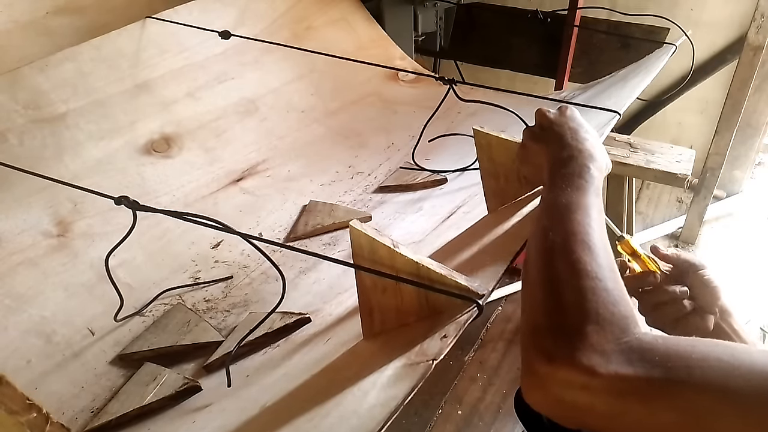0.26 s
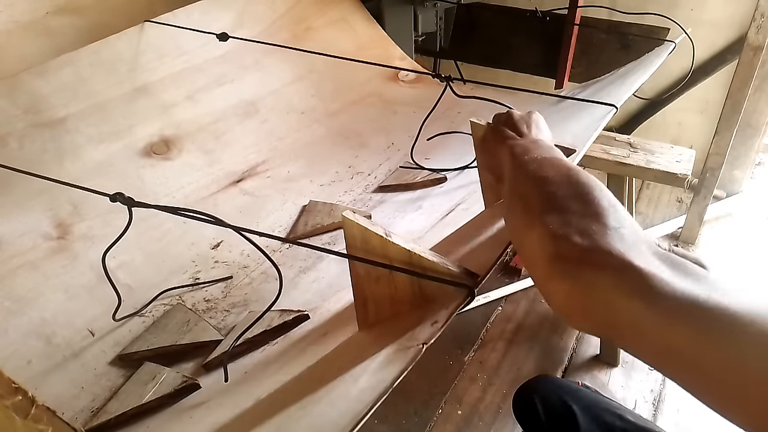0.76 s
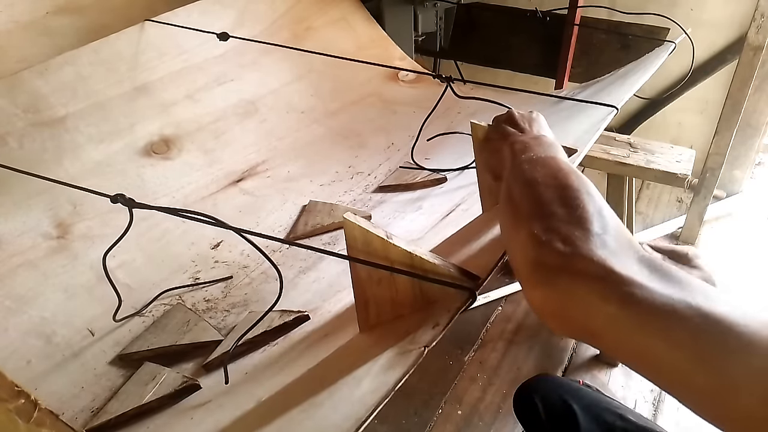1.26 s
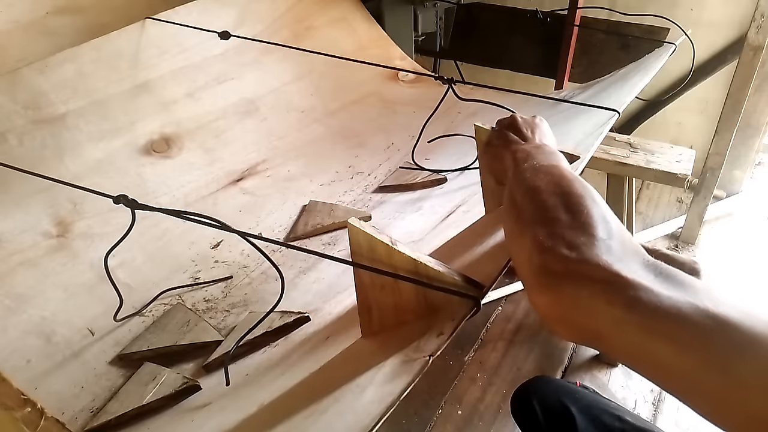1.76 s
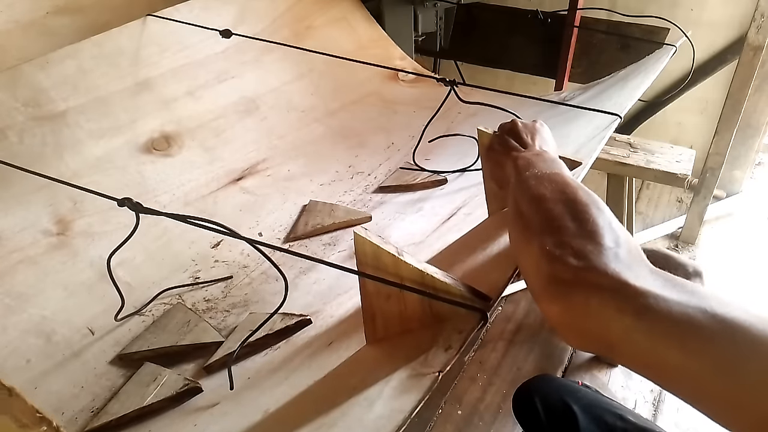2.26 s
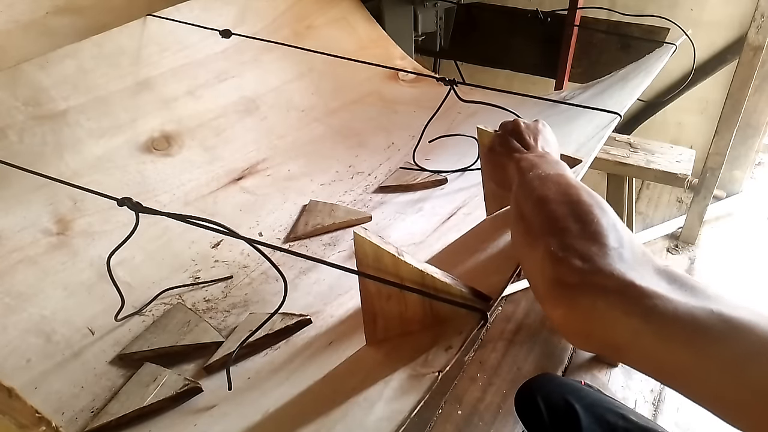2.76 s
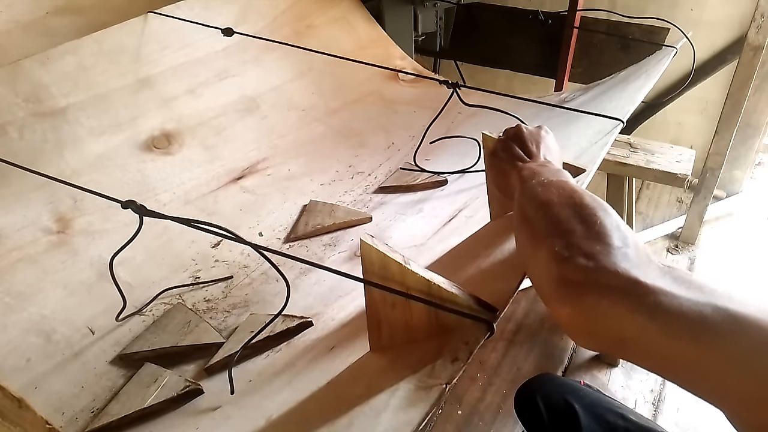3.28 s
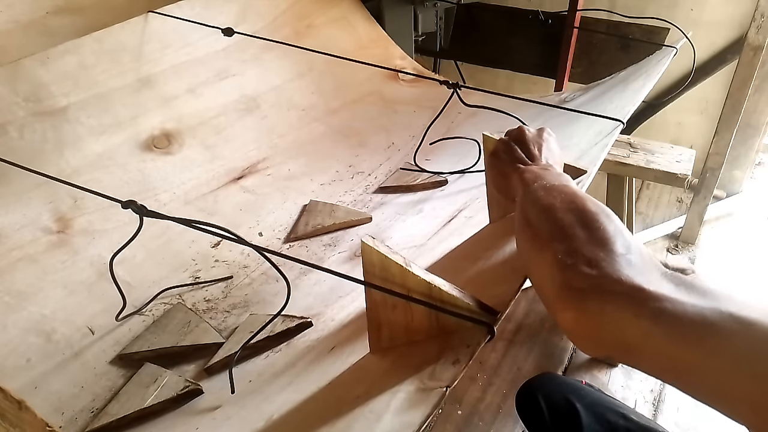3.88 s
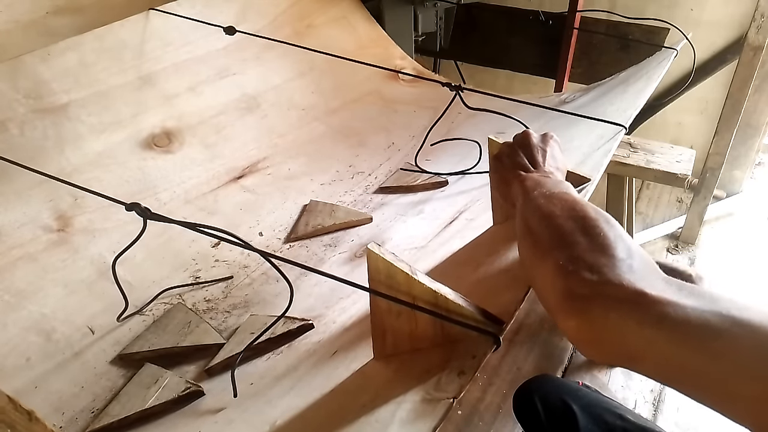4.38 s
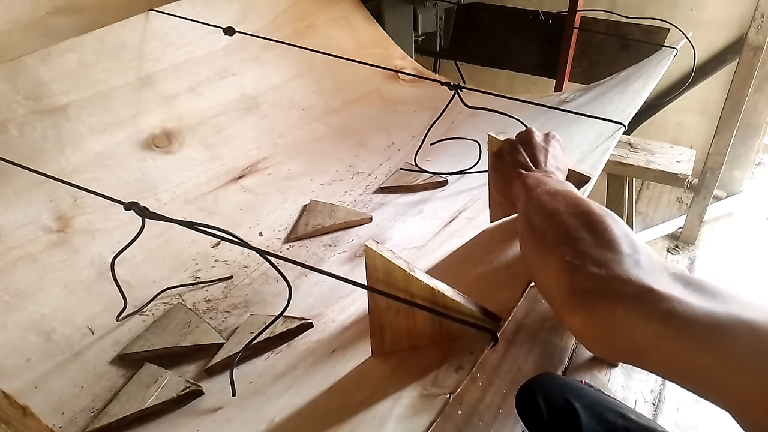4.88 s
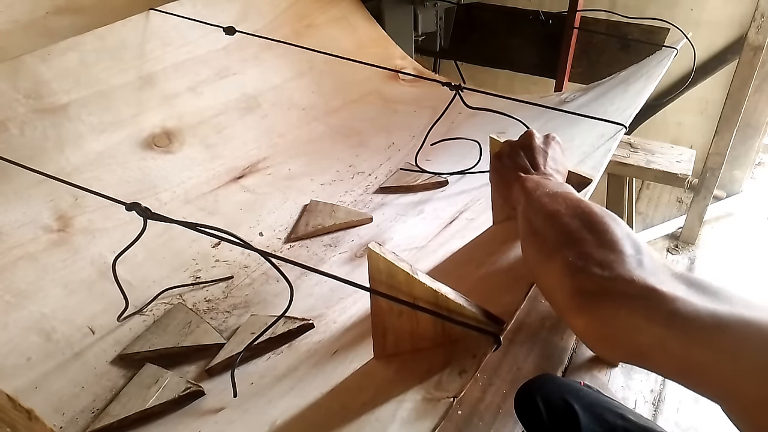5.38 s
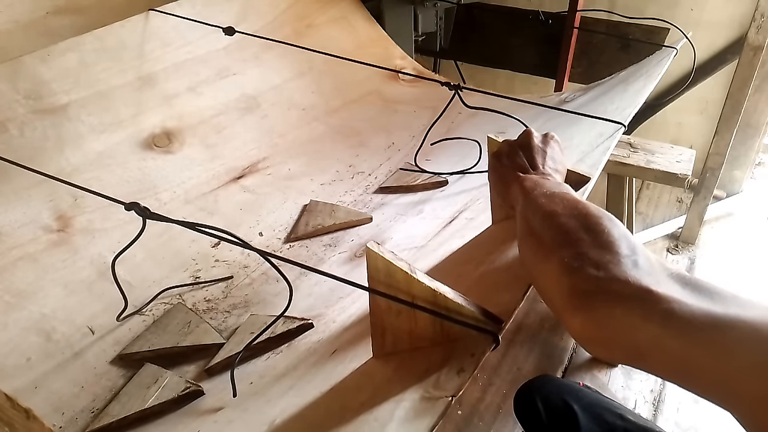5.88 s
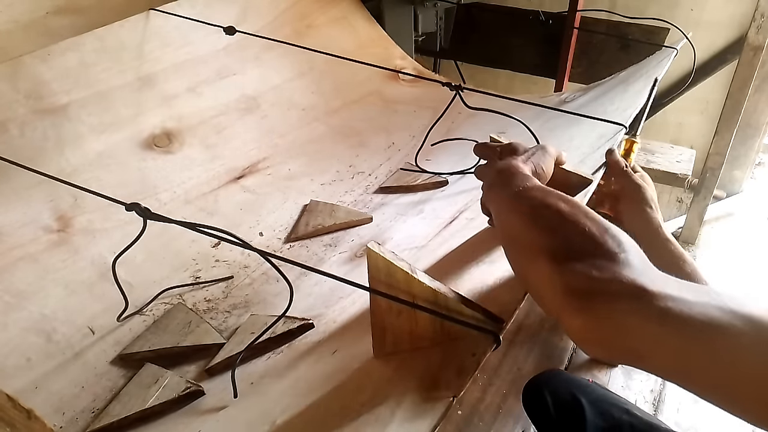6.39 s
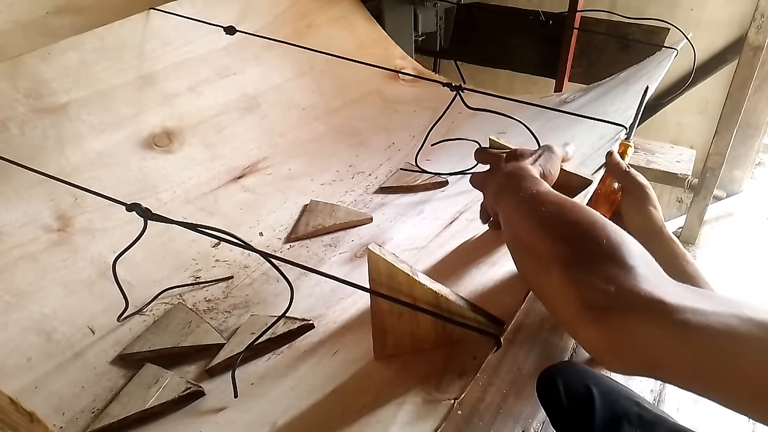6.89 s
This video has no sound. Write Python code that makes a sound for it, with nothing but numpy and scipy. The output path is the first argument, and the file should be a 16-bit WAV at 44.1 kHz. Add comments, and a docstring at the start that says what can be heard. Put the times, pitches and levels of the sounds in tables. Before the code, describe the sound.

Wire twisted tight with pliers against plywood panels: dull slack creaks with hollow knocks, then louder, sharper rhythmic creaks, ending in a soft turn and bumps.

```python
"""Wire that holds plywood panels together is twisted tight with pliers in a quiet workshop.
First the wire is slack: dull creaks of random slips ring in the panels, and between turns the tool drags
back with a scrape and a hollow knock. At about 2.7 s the wire bites: the creaks grow louder and sharper,
each between a faint strain and a dull groan. Near 6 s it is let go, and one softer turn follows. Hand and
sleeve rub the wood throughout; soft bumps come now and then, mostly near the end, over air and rumble."""
import sys
import numpy as np
from scipy import signal
from scipy.fft import rfft, irfft
from scipy.io import wavfile

SR = 44100
rng = np.random.default_rng(int(sys.argv[2]) if len(sys.argv) > 2 else 0)


def wav_record(signal):
    """Record a signal, one row per channel, as 16-bit PCM in the file named by sys.argv[1]."""
    frames = np.transpose(np.atleast_2d(signal))
    bounded = np.clip(frames, -1, 1)
    # unit amplitude maps onto the largest positive 16-bit level
    quanta = np.round(bounded * 32767).astype(np.int16)
    wavfile.write(sys.argv[1], SR, quanta)


N = 314874
AGE = np.arange(int(.4 * SR)) / SR   # seconds since the start of a short sound

# Resonances of wire and plywood. Each row: frequency in Hz, width in Hz, relative level in dB.
PANEL = [(720, 208, -1.5), (827.8, 24.4, 2), (823.1, 31, 4), (939, 127, 1.94), (959.6, 41.7, 6),
         (1170, 149, -4), (1393, 340, -7.5), (1600, 52, -5), (1688, 54, -5), (1975, 246, -9),
         (2099, 204, -1.5), (2120, 252, 0), (2430, 153, 3), (2395, 113, -3.5), (2570, 45, -14),
         (2625, 410, -5), (3300, 160, -8.5), (3524, 215, -7.5), (4480, 490, -11), (5190, 610, -14.5),
         (6250, 230, -14), (6840, 310, -14.5), (7640, 500, -16), (8800, 820, -23), (9970, 2000, -30),
         (15100, 616, -38)]
# Low bending modes of the panel, driven through the wire. Each row: frequency in Hz, width in Hz,
# relative level in dB.
BENDING = [(153.7, 48, -6.5), (199, 28, -8.5), (275.8, 33.3, -1), (342, 23, -1.5), (361, 40, -5.5),
           (483, 82, -14), (578, 41, -11)]
# Turns of the tool. Each row: start in seconds, build-up in seconds, relative level of the first snap in dB,
# creak level in dB, knock level in dB, squeak pitch in Hz.
TURNS = [(0.252, 0.0079, -12, -50.5, -60, 1100), (.735, .01, -2, -60.5, -52.5, 710),
         (1.061, .024, -5, -53.5, -56, 1610), (1.545, .022, -11, -51.3, -58.5, 1320),
         (1.829, 0.0018, 3, -49, -63, 800), (2.113, 0.00066, -5, -47, -53.5, 1740),
         (2.398, 0.014, -13, -44.5, -48.5, 910), (2.719, 0.019, -11, -38.5, -46, 970),
         (3.074, 0.012, -9, -36, -45.5, 765), (3.417, .014, -22, -35.5, -49, 990),
         (3.784, 0.0015, 8.5, -33, -50.5, 1800), (4.1613, 0.0014, 3.5, -34.5, -47, 1650),
         (4.56, 0.012, -5, -31, -44.5, 920), (4.936, 0.0066, 0.5, -33.5, -46, 850),
         (5.3138, 0.0023, 3, -31.5, -47.5, 2650), (5.7281, 0.0042, -3.5, -31, -46.5, 2513),
         (6.068, 0.019, -5, -48, -52.5, 1330)]


def from_db(db):
    """Decibels to gain."""
    return 10 ** (np.asarray(db) / 20)


def add(out, s, sound):
    """Mix a sound in at time s, in seconds."""
    i = max(0, round(s * SR))
    out[i:i + len(sound)] += sound[:N - i]


def at_level(sound, db):
    """Scale a short sound so that its first 80 ms have this rms level."""
    loudness = np.sqrt(np.mean(sound[:int(.08 * SR)] ** 2) + 1e-20)
    return from_db(db) * sound / loudness


def cut(x, hz, kind):
    """Second-order high- or low-pass."""
    return signal.sosfilt(signal.butter(2, hz, kind, fs=SR, output="sos"), x)


def resonate(x, modes):
    """Parallel resonances of alternating sign; a narrower one rings longer."""
    out = 0
    for k, (hz, width_hz, db) in enumerate(modes):
        r = np.exp(-np.pi * width_hz / SR)
        poles = [1, -2 * r * np.cos(2 * np.pi * hz / SR), r * r]
        gain = (-1) ** k * from_db(db) * (1 - r * r) / 2
        out = out + gain * signal.lfilter([1, 0, -1], poles, x + 1e-18)
    return out


def brighten(x, db_per_octave, corner_hz=1000, top_hz=4200):
    """A harder contact tilts the treble up, a softer one down; the tilt levels off at the top."""
    size = 2 * len(x)
    hz = np.fft.rfftfreq(size, 1 / SR)
    octaves = np.log2((1 + (hz / corner_hz) ** 2) / (1 + (hz / top_hz) ** 2)) / 2
    return irfft(rfft(x, size) * from_db(db_per_octave * octaves))[:len(x)]


def coloured(x, spectrum):
    """Give a long signal a spectrum; rms 1."""
    hz, db = np.transpose(spectrum)
    log_hz = np.log(np.fft.rfftfreq(N, 1 / SR) + 1)
    gain = from_db(np.interp(log_hz, np.log(hz), db))
    gain[0] = 0
    y = irfft(rfft(x) * gain, N)
    return y / np.std(y)


def slips(size, per_s, spread_db):
    """Tiny stick-slip releases at random moments, of uneven strength and random sign."""
    unevenness = np.clip(rng.standard_normal(size), -2, 2)
    strength = from_db(spread_db * unevenness) * rng.choice([-1, 1], size)
    return strength * (rng.random(size) < per_s / SR)


def push(build_s, fade_s, start):
    """Force swells from a starting share to its peak, then dies away exponentially."""
    build_s, fade_s = max(build_s, 1 / SR), max(fade_s, 1 / SR)
    swell = start + (1 - start) * AGE / build_s
    release = np.exp(-np.maximum(AGE - build_s, 0) / fade_s)
    return np.where(AGE < build_s, swell, release)


def snap(length_s):
    """A sudden release, spread over a moment by its travel along the wire; energy 1."""
    burst = rng.choice([-1, 1], len(AGE)) * np.exp(-AGE / max(length_s, 1 / SR))
    return burst / np.linalg.norm(burst)


def tail(t60, delay_s):
    """Energy of reflections that begin after a delay and fall 60 dB in t60 seconds; sum 1."""
    energy = from_db(-120 * np.maximum(AGE - delay_s, 0) / t60) * (AGE >= delay_s)
    return energy / energy.sum()


def diffuse(x, energy):
    """Countless reflections blur a sound into noise that follows its power."""
    power = signal.fftconvolve(x ** 2, energy)[:len(x)]
    return np.sqrt(np.maximum(power, 0)) * rng.standard_normal(len(x))


def workshop(x):
    """Direct sound, scatter between the panels, an echo off the roof and a short dull tail."""
    near = from_db(-5) * diffuse(x, tail(t60=.072, delay_s=.0031))
    echo = from_db(-7) * diffuse(x, tail(t60=.085, delay_s=.019))
    room = from_db(-13) * cut(diffuse(x, tail(t60=.22, delay_s=.014)), 4500, "low")
    return x + near + echo + room


def squeak(x, hz, lift_db):
    """The slips favour one range of pitch, set by the grip and the tension: a broad peak in the creak."""
    return x + (from_db(lift_db) - 1) * resonate(x, [(hz, .33 * hz, 0)])


def stroke(build_s, fade_s, first_db, level_db, brightness, knock_db, squeak_hz, lift_db):
    """The wire breaks free with a snap, then chatters through its hole; the pull also bends the panel."""
    # a wire that held long snaps hard and chatters at once; otherwise the creak swells from little
    start = min(1, .61 * from_db(first_db))
    chatter = slips(len(AGE), per_s=1400, spread_db=2.5) * push(build_s, fade_s, start)
    chatter = chatter / (np.linalg.norm(chatter) + 1e-12)
    first_snap = from_db(first_db - 1.5) * snap(length_s=.0012)
    drive = workshop(chatter + first_snap)
    creak = cut(resonate(squeak(drive, squeak_hz, lift_db), PANEL), 600, "high")
    knock = cut(resonate(drive, BENDING), 900, "low")
    return at_level(brighten(creak, brightness), level_db) + at_level(knock, knock_db)


def tension(s):
    """How taut the wire is at time s: slack at first, then it bites, tightens slowly and is let go."""
    # Each row: time in seconds, share of full tension from 0 to 1.
    course = [(0, 0.16), (2.4, 0), (3.07, .68), (4.94, 0.85), (5.73, 0.98), (6.05, 0)]
    return np.clip(np.interp(s, *np.transpose(course)), 0, 1)


def still_air(level_db=-58):
    """Workshop air: steady noise with a fixed spectrum."""
    # Each row: frequency in Hz, relative density in dB per Hz.
    air_spectrum = [(40, -5), (80, -8), (160, -10.5), (300, -10), (500, -17.5), (900, -29.5), (1800, -17.5),
                    (3200, -22.5), (5000, -31.5), (6500, -34), (7700, -27.5), (8500, -35.5), (9800, -35),
                    (11000, -61), (15000, -78)]
    return from_db(level_db) * coloured(rng.standard_normal(N), air_spectrum)


def faint_rumble(level_db=-67):
    """Steady noise confined to the lowest bass."""
    # Each row: frequency in Hz, relative density in dB per Hz.
    rumble_spectrum = [(10, -21), (25, -4), (50, 2), (100, 0), (200, -45)]
    return from_db(level_db) * coloured(rng.standard_normal(N), rumble_spectrum)


def rubbing(uneven_db=4.5, grips_per_s=35):
    """Hand and sleeve drag over the wood: dense tiny slips under uneven pressure."""
    # Each row: time in seconds, level in dB before the uneven pressure.
    rub_levels = [(0, -52.5), (.55, -58.5), (.85, -53.5), (1.7, -54.5), (2.6, -55), (3.7, -56.5),
                  (5.9, -58), (6.449, -56), (6.7, -58.5), (7.14, -54)]
    # Each row: frequency in Hz, relative density in dB per Hz.
    rub_spectrum = [(100, -12.5), (200, -3.5), (290, -5), (520, -7.5), (850, -9.5), (1300, -14.5),
                    (2500, -23), (5000, -30.5), (9000, -48), (14000, -67)]
    t = np.arange(N) / SR
    s, level_db = np.transpose(rub_levels)
    grips = np.clip(rng.standard_normal(N), -2, 1)
    pressure = np.interp(t * grips_per_s, np.arange(N), grips)
    grain = coloured(slips(N, per_s=2100, spread_db=1), rub_spectrum)
    return grain * from_db(np.interp(t, s, level_db) + uneven_db * pressure)


def bumps():
    """Soft flesh lands as a smooth push of noise and excites mostly the low modes."""
    # A hand bumps the panel. Each row: start in seconds, build-up in seconds, fade in seconds, level in dB.
    hand_bumps = [(0.56, 0.00083, 0.016, -48), (4.149, .0025, 0.018, -47.5), (6.28, .0073, .014, -49),
                  (6.415, 0.011, 0.0044, -43), (6.477, .0053, 0.01, -54), (7.118, 0.0072, .012, -46.5)]
    # The panel damped under a palm. Each row: frequency in Hz, width in Hz, relative level in dB.
    palm_modes = [(85.5, 30, -0.5), (143, 107, 2.5), (198, 84, 5.5), (300, 98, -0.5), (418, 126, -4),
                  (637, 43, -7.5), (1040, 580, -22)]
    out = np.zeros(N)
    for s, build_s, fade_s, level_db in hand_bumps:
        force = rng.standard_normal(len(AGE)) * push(build_s, fade_s, start=.23)
        thud = cut(resonate(workshop(force), palm_modes), 3400, "low")
        add(out, s, at_level(thud, level_db))
    return out


def slides():
    """Shifted in the hand, the tool scrapes softly over the wood."""
    # Each row: start in seconds, scrape level in dB.
    tool_slides = [(0.774, -61), (.98, -58), (4.036, -54), (4.485, -57.5), (6.135, -58), (6.826, -53.5),
                   (7.008, -54)]
    out = np.zeros(N)
    for s, scrape_db in tool_slides:
        scrape = stroke(build_s=.015, fade_s=.015, first_db=-5, level_db=scrape_db, brightness=-15,
                        knock_db=-54.5, squeak_hz=1410, lift_db=9.5)
        add(out, s, scrape)
    return out


def ticks():
    """The jaws touch the wire in one short, bright click that rings in the panel."""
    # Light metal ticks of the pliers. Each row: start in seconds, level in dB.
    jaw_ticks = [(1.163, -61.5), (1.414, -61), (1.677, -68), (1.95, -60), (2.24, -65), (3.222, -62.5),
                 (3.943, -58), (4.106, -57), (5.039, -65.5), (6.847, -58), (7.124, -66)]
    out = np.zeros(N)
    for s, level_db in jaw_ticks:
        click = resonate(workshop(snap(length_s=.0024)), PANEL)
        add(out, s, at_level(brighten(click, db_per_octave=5.5), level_db))
    return out


def returns():
    """The tool drags back with a light scrape and seats near the end of the push with one hollow knock."""
    # Back strokes, which set the tool for the next turn. Each row: start in seconds, build-up in seconds,
    # scrape level in dB, knock level in dB before the trims below, squeak pitch in Hz.
    back_strokes = [(0.12, 0.024, -57.5, -59, 1190), (0.335, 0.0095, -54, -55.5, 1380),
                    (.883, .016, -51, -52.5, 1170), (1.152, 0.01, -50, -49, 1240),
                    (1.414, 0.0055, -50, -52, 970), (1.658, 0.024, -51.5, -52.5, 1190),
                    (1.941, 0.012, -51, -45, 1340), (2.222, 0.013, -51.5, -45, 1280),
                    (2.519, 0.0079, -48, -47.5, 1350), (2.859, 0.013, -52.5, -49.5, 1280),
                    (3.213, 0.013, -51.5, -46.5, 1390), (3.564, .01, -53, -54, 1420),
                    (3.939, 0.0023, -55, -52.5, 810), (4.33, 0.014, -59.5, -52.5, 1450),
                    (4.722, 0.0049, -53, -48.5, 1040), (5.099, 0.0066, -51.5, -52, 1440),
                    (5.493, 0.014, -59, -51.5, 1300)]
    drag_trim_db, seat_trim_db = -1, -.5
    out = np.zeros(N)
    impulse = 1. * (AGE == 0)
    seat = cut(cut(resonate(impulse, BENDING), 250, "high"), 450, "low")
    for s, build_s, scrape_db, knock_db, squeak_hz in back_strokes:
        brightness = -12.5 + 2.53 * s   # dB per octave, rising steadily with time
        drag = stroke(build_s, fade_s=.007, first_db=-6, level_db=scrape_db, brightness=brightness,
                      knock_db=knock_db + drag_trim_db, squeak_hz=squeak_hz, lift_db=8.5)
        add(out, s, drag)
        add(out, s + .904 * build_s, at_level(seat, knock_db + seat_trim_db))
    return out


def strain_and_settle():
    """A taut wire strains in a faint creak before each turn; the panel settles in a dull groan after it."""
    taut_share, strain_lead_s, settle_lag_s = .2, .05, .067
    settle_loss_db_per_s = 2.5   # the panel has less give with every turn
    out = np.zeros(N)
    taut_turns = [s for s, *_ in TURNS if tension(s) > taut_share]
    for s in taut_turns:
        loss_db = settle_loss_db_per_s * (s - taut_turns[0])
        strain = stroke(build_s=.012, fade_s=.016, first_db=-21, level_db=-58.5, brightness=-10,
                        knock_db=-54, squeak_hz=1010, lift_db=4)
        settle = stroke(build_s=.012, fade_s=.01, first_db=-20, level_db=-52.5 - loss_db, brightness=-36,
                        knock_db=-51 - loss_db, squeak_hz=693.6, lift_db=2)
        add(out, s - strain_lead_s, strain)
        add(out, s + settle_lag_s, settle)
    return out


def turns():
    """Each turn makes the wire slip in a short creak; the tighter the wire, the sharper the creak."""
    slack_brightness, tight_brightness = -14, 3.7   # dB per octave
    out = np.zeros(N)
    for s, build_s, first_db, level_db, knock_db, squeak_hz in TURNS:
        brightness = slack_brightness + tension(s) * (tight_brightness - slack_brightness)
        creak = stroke(build_s, fade_s=.0066, first_db=first_db, level_db=level_db, brightness=brightness,
                       knock_db=knock_db, squeak_hz=squeak_hz, lift_db=3)
        add(out, s, creak)
    return out


def scene():
    """The still air of the workshop and a faint rumble, then hand and tool, in one channel."""
    background = still_air() + faint_rumble()
    hand = rubbing() + bumps()
    tool = slides() + ticks() + returns() + strain_and_settle() + turns()
    return (background + hand + tool)[None]


def record(dry):
    """The top is cut steeply; the converter rests slightly off zero."""
    cutoff_hz, offset = 15700, .0258
    low_pass = signal.ellip(10, .2, 70, cutoff_hz, fs=SR, output="sos")
    return signal.sosfilt(low_pass, dry) + offset


dry = scene()
out = record(dry)
wav_record(out)
```